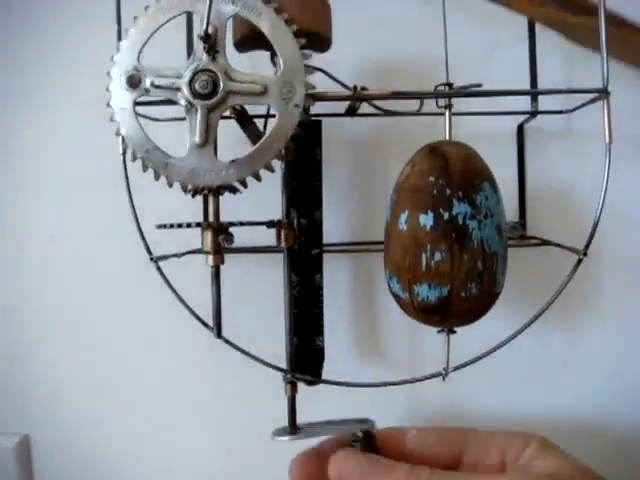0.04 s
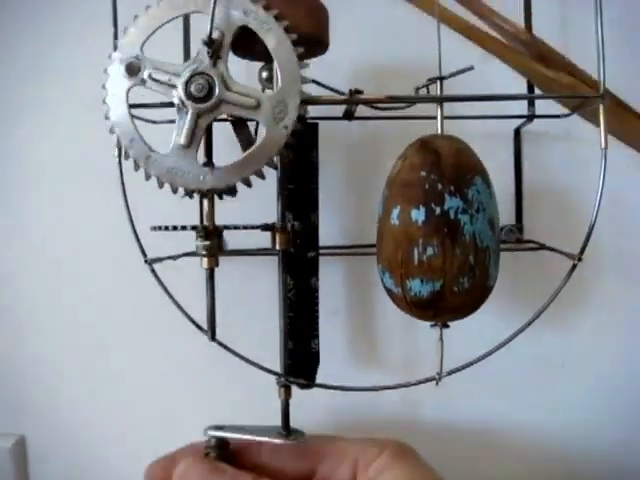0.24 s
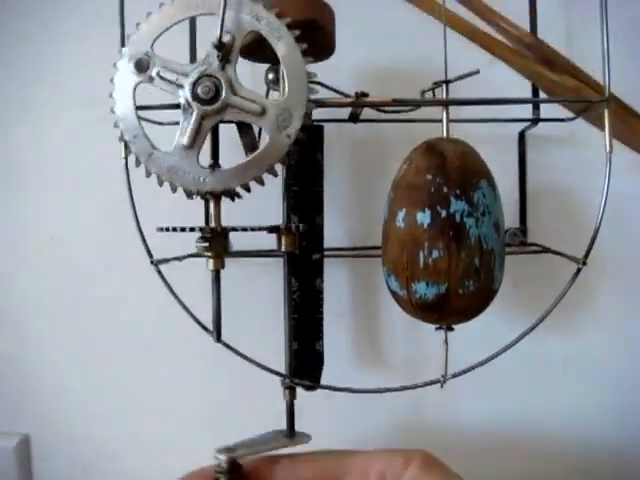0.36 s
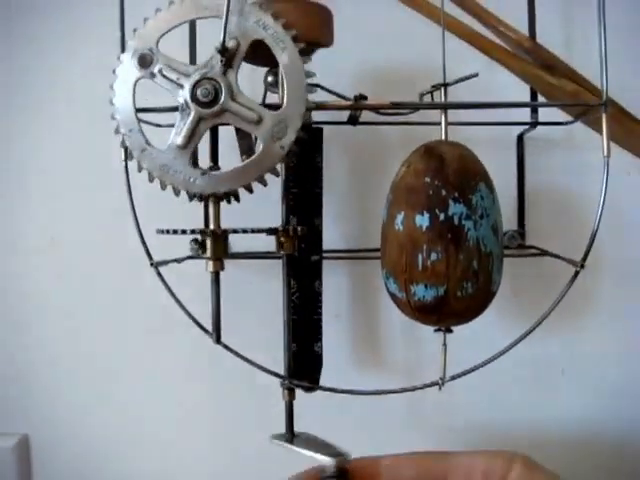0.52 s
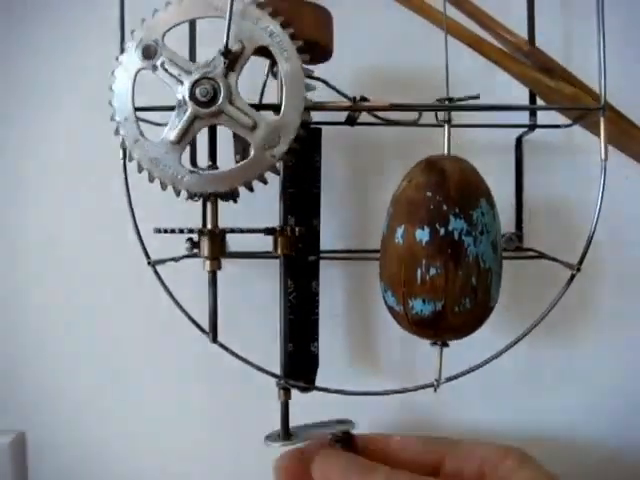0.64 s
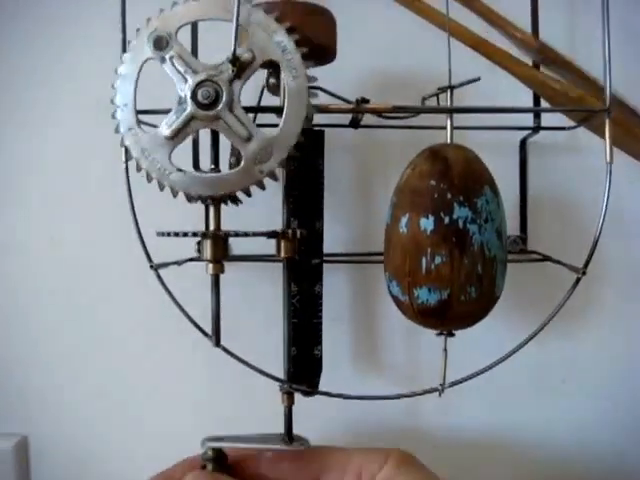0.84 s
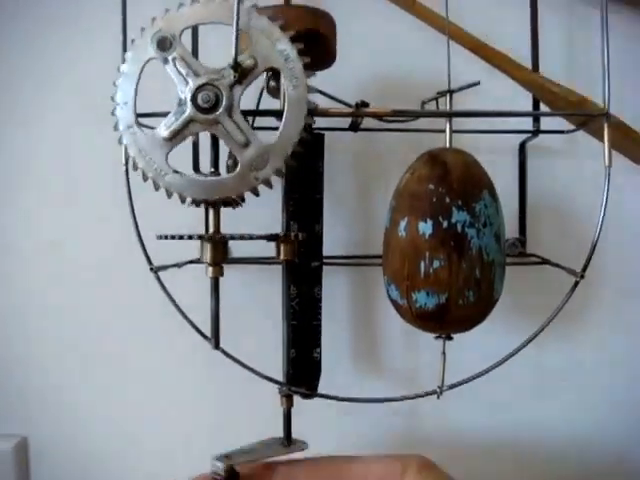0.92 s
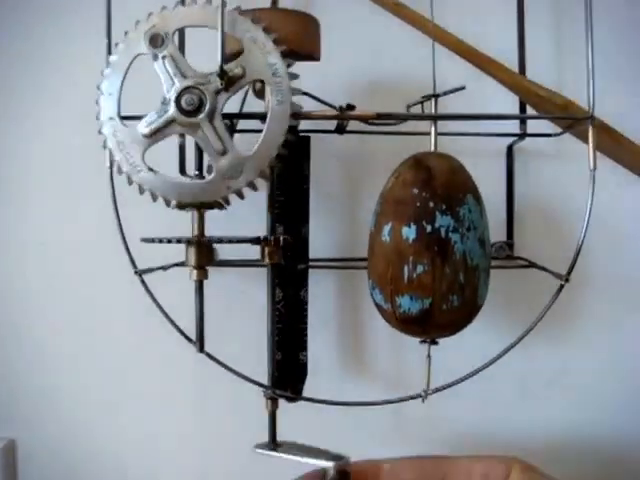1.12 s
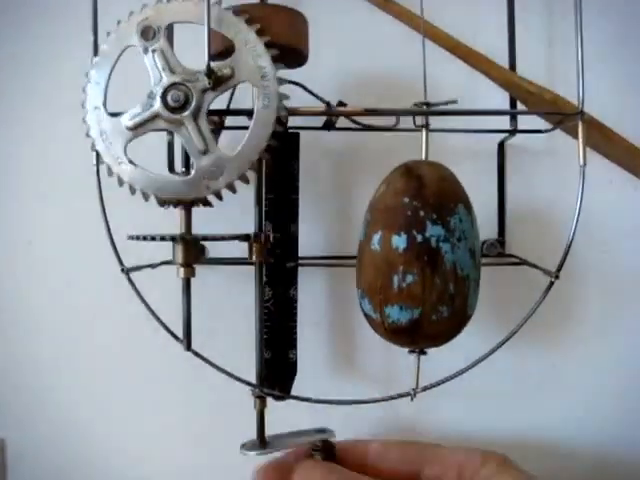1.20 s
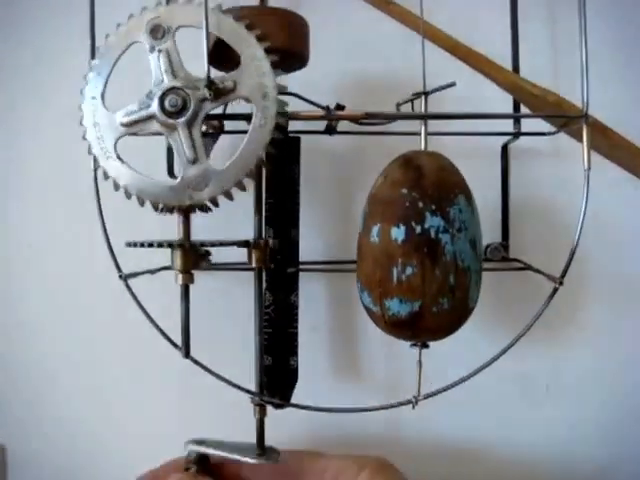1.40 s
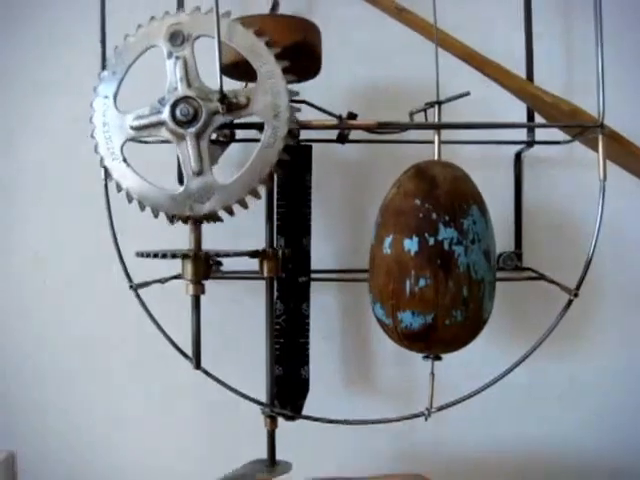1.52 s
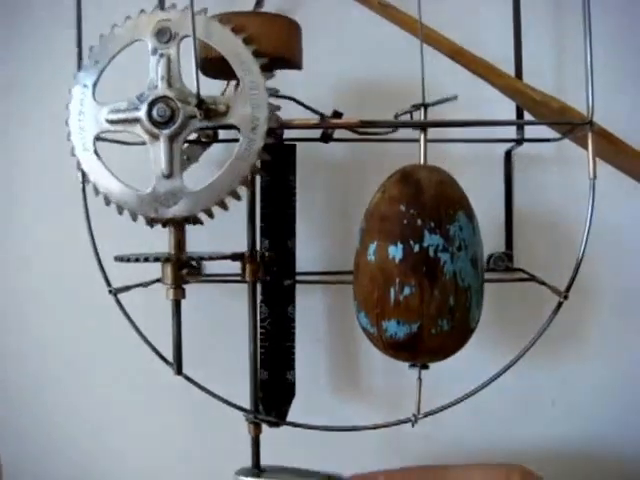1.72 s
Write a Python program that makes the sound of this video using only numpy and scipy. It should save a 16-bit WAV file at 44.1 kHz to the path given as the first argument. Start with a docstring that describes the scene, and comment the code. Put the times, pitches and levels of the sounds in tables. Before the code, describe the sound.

A hand-cranked sculpture of metal and wood clacks loudly in a quick steel chatter, then gives two weaker, slightly hollow knocks about half a second apart. Gears rub, joints tick and a shaft squeaks faintly, close up in a small room.

```python
"""A hand-cranked sculpture of wire and wood turns close to the microphone in a small workshop.
About every half second a lever drops and knocks the frame; the first drop sets a steel striker
chattering, and the later ones jolt a hollow wooden egg. Between drops the gears rub, the joints tick
and a dry shaft squeaks, over faint hiss and rumble. The loudest clacks overload the microphone."""
import sys
import numpy as np
from scipy import signal
from scipy.fft import rfft, irfft
from scipy.io import wavfile

SR = 44100
rng = np.random.default_rng(int(sys.argv[2]) if len(sys.argv) > 2 else 0)


def int16_out(signal):
    """Quantize to a 16-bit WAV file."""
    q = np.round(np.clip(np.atleast_2d(signal).T, -1, 1) * 32767)
    wavfile.write(sys.argv[1], SR, q.astype(np.int16))


N = 77175
T = np.arange(N) / SR
SHARP_RISE_S, SOFT_RISE_S = 0.0006, 0.0029  # how quickly a hit gets loud


def gain(db):
    """Turn decibels into a number to multiply a sound by."""
    return 10 ** (np.asarray(db) / 20)


def level_curve(points):
    """A gain that slides from one (time, level) point to the next."""
    return gain(np.interp(T, *np.array(points).T))


def noise(tone):
    """Steady noise, made dull or bright by a list of (frequency, level) points."""
    hz, db = np.array(tone).T
    all_hz = np.maximum(np.arange(N // 2 + 1) * SR / N, 1)
    shape = gain(np.interp(np.log(all_hz), np.log(hz), db))
    shaped = irfft(rfft(rng.standard_normal(N)) * shape, N)
    return shaped / shaped.std()


def wobble(rate_hz):
    """A smooth random wobble, about 1 in size."""
    smooth = signal.sosfilt(signal.butter(2, rate_hz, fs=SR, output="sos"), rng.standard_normal(N))
    return smooth / smooth.std()


def rise_and_fade(rise_s, fade_s):
    """The loudness of one hit. A fade time is how long a sound takes to drop by 60 dB."""
    age = T[:int(2 * fade_s * SR) + 2]
    return (1 - np.exp(-age / rise_s)) * np.exp(-np.log(1000) * age / fade_s)


def spikes(times, levels_db):
    """Silence with one spike for each hit."""
    samples = np.round(np.atleast_1d(times) * SR).astype(int)
    return np.bincount(np.clip(samples, 0, N - 1), gain(levels_db) * np.ones(len(samples)), N)


def play(hits, sound):
    """Start a copy of the sound at every spike."""
    return signal.fftconvolve(hits, sound)[:N]


def ring(times, levels_db, notes, rise_s=SHARP_RISE_S, pitch=1):
    """A struck part rings with its own few notes, each fading at its own speed."""
    one_hit = np.zeros(N)
    for hz, db, fade_s in notes:
        shape = rise_and_fade(rise_s, fade_s)
        one_hit[:len(shape)] += gain(db) * shape * np.sin(2 * np.pi * hz * pitch * T[:len(shape)])
    return play(spikes(times, levels_db), one_hit)


def bursts(times, levels_db, tone, fade_s, rise_s=SHARP_RISE_S):
    """Many short notes at once blur into a burst of noise at each hit."""
    energy = play(spikes(times, levels_db) ** 2, rise_and_fade(rise_s, fade_s) ** 2)
    return noise(tone) * np.sqrt(np.abs(energy))


# squeaks of the shaft (time [s], length [s], pitch [Hz], level [dB])
SQUEAKS = [(-.02, 0.18, 3184, -46.5), (0.042, 0.13, 2815, -44.5), (0.19, 0.079, 2946, -35.5),
           (0.699, 0.014, 3195, -34.5), (1.261, 0.1, 3260, -41.5), (1.312, 0.024, 3040, -36.5)]

def shaft(roughness_hz=230, rise_s=0.0042, fade_s=0.099):
    """The dry shaft rubs and keeps a rod singing roughly, then lets it go."""
    out = np.zeros(N)
    for start, length, hz, db in SQUEAKS:
        rise = np.clip((T - start) / rise_s, 0, 1)
        fade = np.exp(-np.log(1000) * np.maximum(T - start - length, 0) / fade_s)
        phase = 2 * np.pi * hz * T
        rough_note = wobble(roughness_hz) * np.cos(phase) + wobble(roughness_hz) * np.sin(phase)
        out += gain(db) * rise * fade * rough_note
    return out


# how loudly the gears rub (time [s], level [dB])
GEAR_LEVEL = [(0, -39), (.15, -41), (.2, -33.5), (.55, -38.5), (.65, -41), (.9, -38), (1.18, -41),
              (1.28, -36), (1.75, -37.5)]
# tone of the rubbing (frequency [Hz], level [dB])
GEAR_TONE = [(50, -20), (90, -2), (170, 3.5), (320, -0.5), (560, -0.5), (1500, -8.5), (3100, -11),
             (4200, -21), (10000, -52)]

def gears(flutter_db=1, flutter_hz=24.4):
    """Teeth and bearings rub unevenly, so the level flutters."""
    return noise(GEAR_TONE) * level_curve(GEAR_LEVEL) * gain(flutter_db * wobble(flutter_hz))


# tone of the hiss (frequency [Hz], level [dB])
HISS_TONE = [(20, -9), (100, 5), (6000, 1.5), (9800, -3.5), (11000, -54)]
# how loud the rumble is (time [s], level [dB])
RUMBLE_LEVEL = [(.14, -51), (.18, -36), (.35, -47), (.58, -38.5), (.66, -55), (.71, -34), (.78, -65)]
# tone of the rumble (frequency [Hz], level [dB])
RUMBLE_TONE = [(10, 0), (55, -9.5), (400, -77)]

def hiss_and_rumble(hiss_db=-47.5):
    """A faint steady hiss, and a deep rumble that swells three times early on."""
    return gain(hiss_db) * noise(HISS_TONE) + level_curve(RUMBLE_LEVEL) * noise(RUMBLE_TONE)


# tone of a click on a metal edge (frequency [Hz], level [dB])
METAL_TONE = [(800, -7), (3000, -9), (5400, -2.5), (6400, 4), (7200, -3.5), (8400, 2), (10000, -4),
              (12000, -91)]
METAL_FADE_S = 0.023

def cam(start_s=0.19, end_s=0.25, count=30, level_db=-36, spread_db=4.5):
    """The lever sticks and slips grittily on its cam, the bump that lifts it for the first drop."""
    times = start_s + (end_s - start_s) * rng.random(count)
    levels_db = level_db + spread_db * rng.standard_normal(count)
    return bursts(times, levels_db, METAL_TONE, METAL_FADE_S)


# tone of knocked wood (frequency [Hz], level [dB])
WOOD_TONE = [(45, -37), (75, 8), (140, -2), (420, 3), (620, -4.5), (920, 1), (2350, -5), (3100, 4),
             (3700, -5.5), (5500, -13.5), (10000, -59)]
# notes of the wire rods (pitch [Hz], level [dB], fade time [s])
ROD_NOTES = [(1019, -7, 0.14), (1578, -16, 0.28), (1970, -18, 0.32), (3006, -12, 0.18), (3230, -15, 0.28)]

def knocks(times, wood_db, metal_db):
    """Each knock sounds the wood, clicks a metal edge and shakes the wire rods."""
    wood = bursts(times, wood_db, WOOD_TONE, fade_s=0.091)
    metal = bursts(times, metal_db, METAL_TONE, METAL_FADE_S)
    rods = ring(times, wood_db - 7.5, ROD_NOTES)
    return wood + metal + rods


# levers landing and bouncing (time [s], wood level [dB], metal level [dB], thud level [dB])
LANDINGS = [(.207, -21, -32, -23.5), (0.216, -27.5, -23, -32), (.231, -24, -32, -18),
            (0.2623, -19.5, -13.5, -31), (0.3033, -14, -24, -21.5), (.308, -12.5, -5.5, -19),
            (.342, -22.5, -45, -30), (.366, -17, -31, -20), (0.7654, -19.5, -28, -24),
            (0.7705, -18.5, -10.5, -27.5), (.788, -28, -58, -20), (0.8079, -18.5, -23, -48),
            (0.823, -22, -22.5, -35), (1.3424, -20, -23, -51), (1.3467, -18.5, -24.5, -35),
            (1.364, -23, -41, -20), (1.3796, -21.5, -22, -37), (1.386, -24, -27, -34)]
# low notes of the frame (pitch [Hz], level [dB], fade time [s])
FRAME_NOTES = [(81.5, -20.5, 0.72), (89.8, -1.5, 0.17), (154, 4, 0.21), (182.3, -11.5, 0.3),
               (233.7, -9, 0.28), (293.3, -12, 0.31), (367.6, -16, 0.18), (440, -8, 0.19)]

def levers():
    """A lever lands with a knock, and the whole frame answers with a low thud."""
    times, wood_db, metal_db, thud_db = np.array(LANDINGS).T
    return knocks(times, wood_db, metal_db) + ring(times, thud_db, FRAME_NOTES, rise_s=0.013)


# notes of the catch (pitch [Hz], level [dB], fade time [s])
CATCH_NOTES = [(1580, -7.5, 0.094), (2756, 0, 0.055), (2998, 7.5, 0.034)]

def catch():
    """A catch slips and chirps just before the striker hits."""
    return ring(times=0.2635, levels_db=-12.5, notes=CATCH_NOTES, rise_s=SOFT_RISE_S)


# the striker's hit and its bounces (time [s], level [dB], pitch [times normal])
CLACKS = [(.3030, 3.5, 1.0), (0.3242, -1, 1.01), (0.3401, 0, .99), (0.3556, -3.5, 1.2), (0.3655, -0.5, 1.0),
          (0.377, -4, 1.13)]
# notes of the steel striker (pitch [Hz], level [dB], fade time [s])
STEEL_NOTES = [(6233, 1.5, 0.015), (6950, -1.5, 0.015), (7470, 1.5, 0.01), (7720, 1, 0.011),
               (8790, -6, 0.017)]
# notes of the bracket that holds it (pitch [Hz], level [dB], fade time [s])
BRACKET_NOTES = [(1571, -0.5, 0.048), (1887, -5.5, 0.033), (3070, -3, 0.03), (3320, 2, 0.037),
                 (4590, 0.5, 0.038)]
# tone of the sharp crack (frequency [Hz], level [dB])
CRACK_TONE = [(300, -24), (1500, -6.5), (5500, 1.5), (6400, 4.5), (8300, 9), (10000, -9.5), (15000, -38)]

def striker(rise_s=0.00075):
    """Steel hits steel with a crack and a short bright ring; the bracket rings lower and longer."""
    times, levels_db, _ = np.array(CLACKS).T
    steel = sum(ring(time, db - 1, STEEL_NOTES, rise_s, pitch) for time, db, pitch in CLACKS)
    bracket = ring(times, levels_db - 14.5, BRACKET_NOTES, SOFT_RISE_S)
    crack = bursts(times, levels_db + 2, CRACK_TONE, fade_s=0.013, rise_s=rise_s)
    return steel + bracket + crack


# light ticks of the joints (time [s], tap level [dB], metal level [dB])
TICKS = [(.552, -29, -34.5), (0.846, -35, -30), (0.8804, -42, -34.5), (1.053, -32, -32.5), (1.23, -31, -38),
         (1.649, -29.5, -25), (1.706, -34, -33.5)]
# tone of the dull tap in each tick (frequency [Hz], level [dB])
TAP_TONE = [(150, -7), (480, 6.5), (1000, 1), (2500, -10), (4500, -6), (10000, -34)]

def joints():
    """Slightly loose joints tick: a dull tap together with a metal click."""
    times, tap_db, metal_db = np.array(TICKS).T
    taps = bursts(times, tap_db, TAP_TONE, fade_s=0.08)
    clicks = bursts(times, metal_db, METAL_TONE, fade_s=0.034)
    return taps + clicks


# notes of the wooden egg (pitch [Hz], level [dB], fade time [s])
EGG_NOTES = [(632, -3, 0.11), (747, -1.5, 0.09), (896, 2, 0.077)]

def egg():
    """The later drops and their bounces knock a hollow sound out of the wooden egg."""
    return ring(times=[0.768, 0.809, 1.348, 1.386], levels_db=-26.5, notes=EGG_NOTES)


# low notes of a hollow part (pitch [Hz], level [dB], fade time [s])
HOLLOW_NOTES = [(82, -7, 0.69), (177.2, 2.5, 0.26), (370.4, -2.5, 0.33)]

def hollow_part():
    """The last drop sets a hollow part booming."""
    return ring(times=1.356, levels_db=-22, notes=HOLLOW_NOTES, rise_s=0.016)


def rattle(start_s=1.398, length_s=0.1, count=7, spread_db=4, fade_db=7.5):
    """After the last drop, loose parts settle in uneven, fading bounces."""
    progress = (np.arange(count) + rng.random(count)) / count
    levels_db = spread_db * rng.standard_normal(count) - fade_db * progress
    return knocks(start_s + length_s * progress, wood_db=levels_db - 36.5, metal_db=levels_db - 35)


# notes of a loose rod (pitch [Hz], level [dB], fade time [s])
LOOSE_ROD_NOTES = [(1585, 1.5, 0.065), (4700, -22, 0.04), (5997, -16, .04)]

def loose_rod():
    """A loose rod pings once."""
    return ring(times=1.65, levels_db=-25.5, notes=LOOSE_ROD_NOTES)


# notes of a pin (pitch [Hz], level [dB], fade time [s])
PIN_NOTES = [(4660, -5, 0.03), (6020, -5, 0.015)]

def pin():
    """A small steel pin gives one high tink."""
    return ring(times=1.7075, levels_db=-29, notes=PIN_NOTES)


# the room's echo, range by range (lowest pitch [Hz], highest pitch [Hz], level [dB], fade time [s])
ECHO_BANDS = [(70.6, 416, -7.5, 0.35), (520, 2260, -8, 0.2), (1950, 4860, -10.5, 0.3),
              (5300, 8100, -27.5, 0.56), (6700, 8370, -25, 0.53)]

def workshop_echo(sound, rise_s=0.051):
    """Sound bounces around the small room and blurs into a short, smooth echo."""
    echo = np.zeros(N)
    for low_hz, high_hz, db, fade_s in ECHO_BANDS:
        shape = rise_and_fade(rise_s, fade_s)
        burst = rng.standard_normal(N)[:len(shape)] * shape / np.linalg.norm(shape)
        band = signal.butter(4, [low_hz, high_hz], "band", fs=SR, output="sos")
        echo[:len(shape)] += gain(db) * signal.sosfilt(band, burst)
    return play(sound, echo)


def scene(bass_limit_hz=54):
    """The sculpture, too small to give off deep bass, in its room over hiss and rumble."""
    drops = striker() + levers() + hollow_part() + egg()
    small_sounds = cam() + rattle() + joints() + catch() + loose_rod() + pin() + shaft()
    bass_cut = signal.butter(4, bass_limit_hz, "high", fs=SR, output="sos")
    sculpture = signal.sosfilt(bass_cut, drops + small_sounds)
    background = hiss_and_rumble()
    return (sculpture + workshop_echo(sculpture) + gears() + background)[None]


def cut_treble(sound, above_hz):
    """Remove nearly everything above a given frequency."""
    return signal.sosfilt(signal.ellip(8, .2, 70, above_hz, fs=SR, output="sos"), sound)


def record(dry, clip_level=0.85, soften_above_hz=14900):
    """The microphone misses high treble, flattens the loudest peaks and softens the crunch this makes."""
    clipped = np.clip(cut_treble(dry, above_hz=10100), -clip_level, clip_level)
    softened = signal.sosfilt(signal.butter(2, soften_above_hz, fs=SR, output="sos"), clipped)
    return cut_treble(softened, above_hz=16000)


dry = scene()
out = record(dry)
int16_out(out)
```